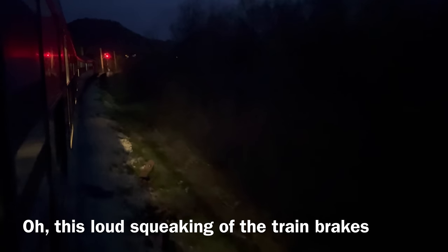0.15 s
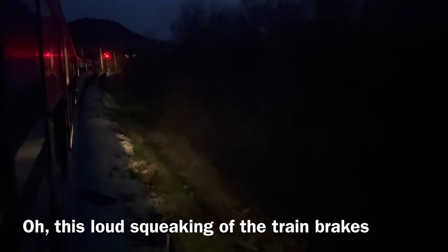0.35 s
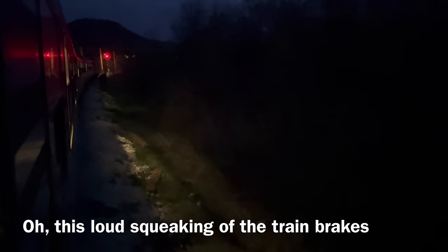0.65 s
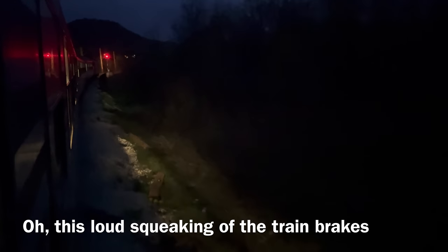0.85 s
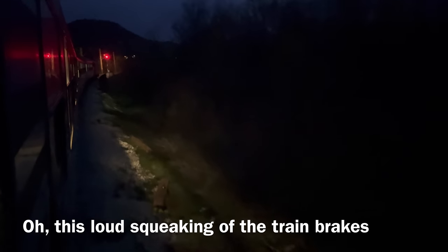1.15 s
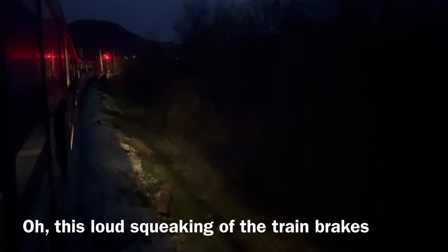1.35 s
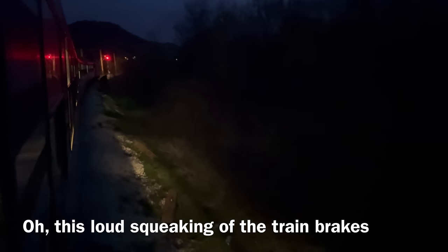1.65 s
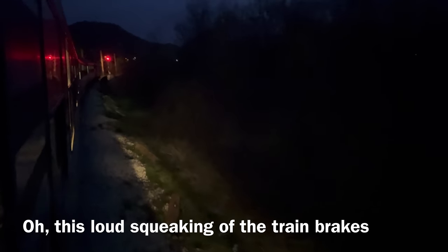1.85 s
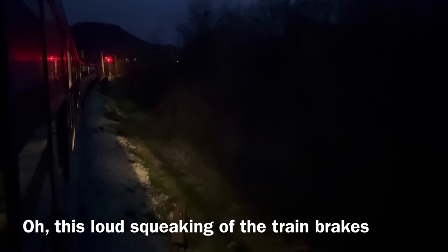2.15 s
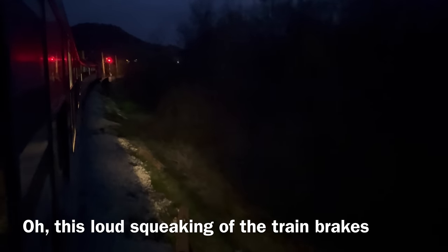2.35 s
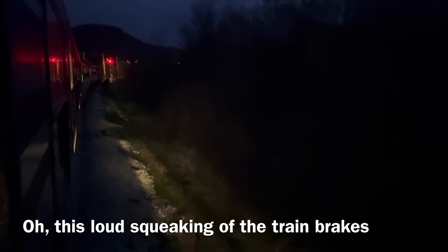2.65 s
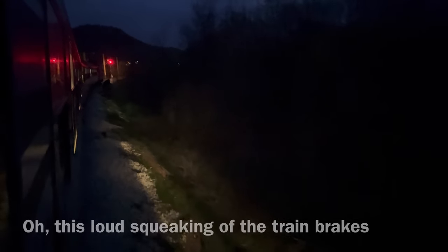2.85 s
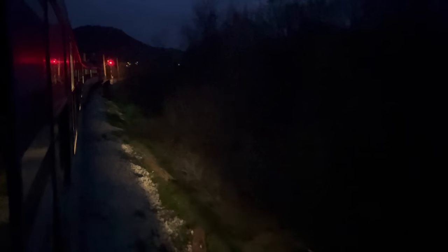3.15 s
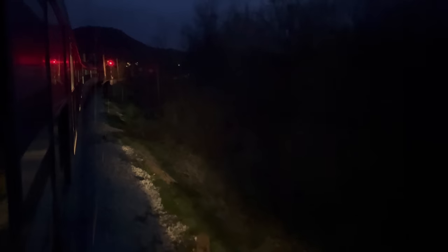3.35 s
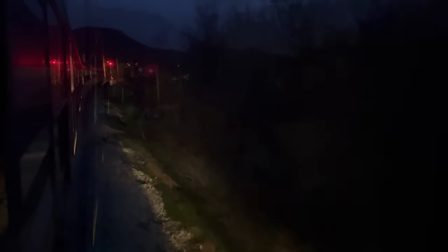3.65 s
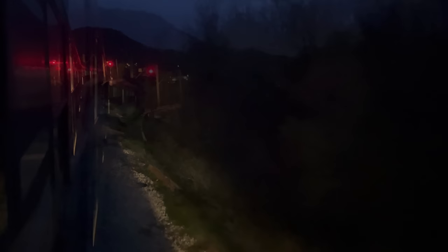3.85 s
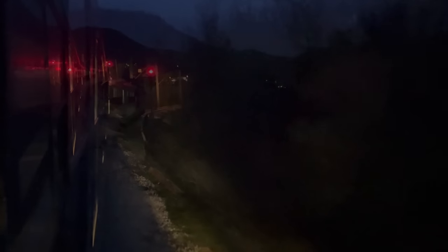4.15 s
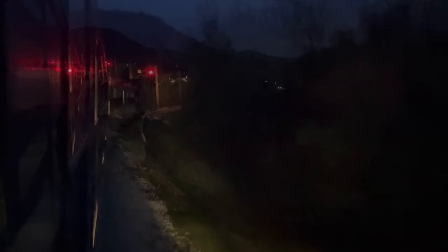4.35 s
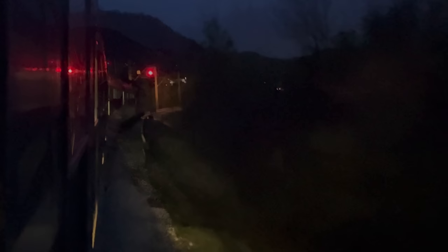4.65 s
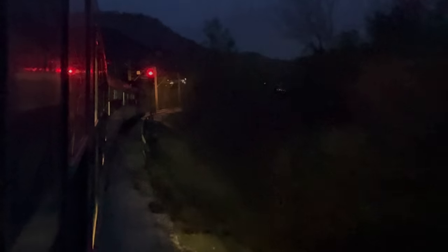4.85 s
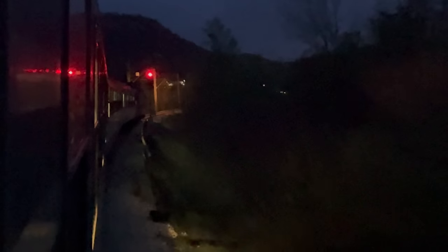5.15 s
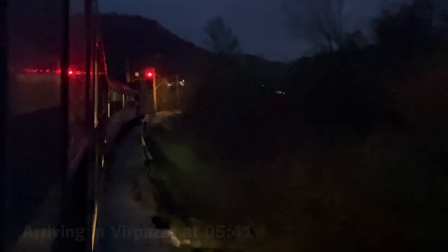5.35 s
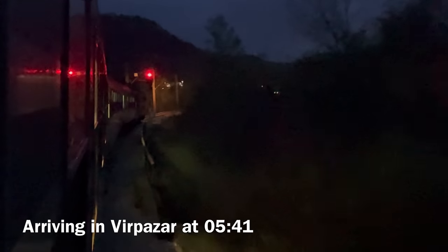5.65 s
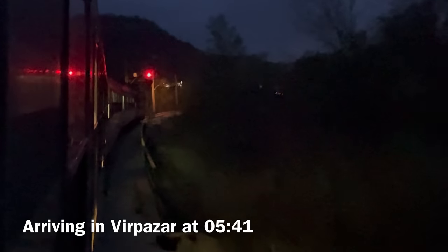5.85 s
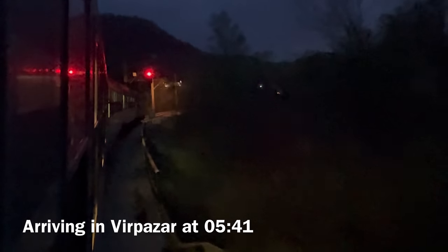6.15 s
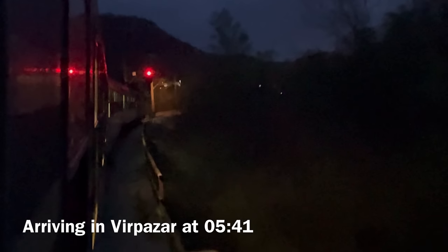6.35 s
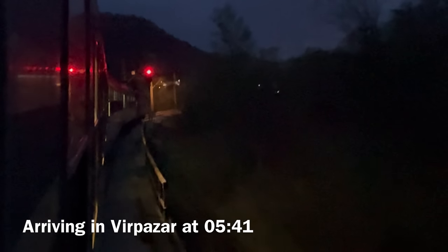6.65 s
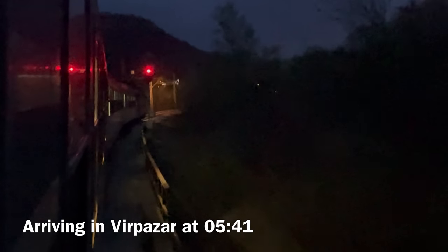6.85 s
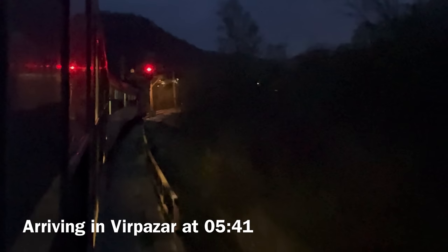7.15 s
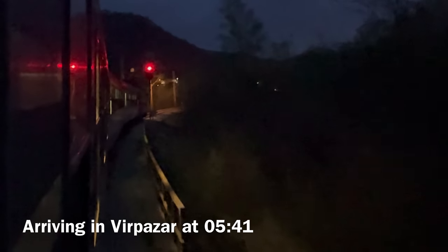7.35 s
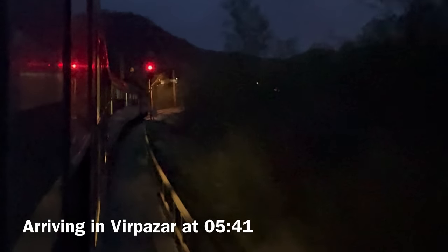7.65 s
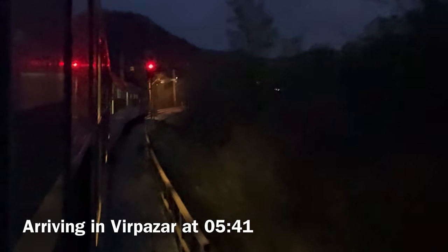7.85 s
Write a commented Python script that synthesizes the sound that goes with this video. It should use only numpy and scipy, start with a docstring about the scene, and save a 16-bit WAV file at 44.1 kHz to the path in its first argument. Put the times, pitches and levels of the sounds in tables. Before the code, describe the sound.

Heard from an open train window, brakes squeal in a piercing, extremely high, fluttering whistle over a quiet low rumble and soft brake hiss. Midway the scene crossfades: the squeal fades, while nearby wheels roar and grind with a bright hiss. Strong low wind buffets and thuds on the exposed stereo microphone, with brief metallic scrapes, continuing to the end.

```python
"""At the open window of a coach, a passenger train brakes.
The brake blocks make the wheels squeal in a few very high modes, each beating over many Doppler-shifted paths.
This squealing scene, over a low distant train, crossfades into a second, windier one.
There rolling noise, grinding hiss and wind are coloured noise, with short thuds of air on the microphone.
Brief rasps, bursts of band-shaped noise, are the wheels scraping."""
import sys
import numpy as np
from scipy import signal
from scipy.fft import rfft, irfft
from scipy.io import wavfile
from scipy.ndimage import uniform_filter1d

SR = 44100
rng = np.random.default_rng(int(sys.argv[2]) if len(sys.argv) > 2 else 0)


def wrap_up_sound(samples):
    """Save the sound to the file named by the first command line argument, as 16-bit audio."""
    columns = np.atleast_2d(samples).T
    # keep every value between -1 and 1, then stretch to whole-number steps
    tamed = np.clip(columns, -1, 1)
    steps = np.round(tamed * 32767).astype(np.int16)
    wavfile.write(sys.argv[1], SR, steps)


N = 352359
T = np.arange(N) / SR
HZ = np.fft.rfftfreq(N, 1 / SR)


def gain_of(db):
    """Decibels to amplitude."""
    return 10 ** (np.asarray(db) / 20)


def evened(x):
    """Scales to rms 1."""
    return x / np.sqrt(np.mean(abs(x) ** 2) + 1e-20)


def curve(rows, axis=1):
    """One column of a time table, for every sample."""
    rows = np.array(rows)
    return np.interp(T, rows[:, 0], rows[:, axis])


def read(rows, axis=1):
    """One column of a frequency table, for every bin."""
    rows = np.array(rows)
    return np.interp(np.log(HZ + 1), np.log(rows[:, 0] + 1), rows[:, axis])


def wander(rate_hz):
    """Smooth chance of rms 1, up to about the given rate."""
    spectrum = rfft(rng.standard_normal(N))
    return evened(irfft(spectrum * np.exp(-(HZ / rate_hz) ** 2), N))


def fade(start, end):
    """Smooth step from 0 at start to 1 at end; it falls instead when end is the earlier moment."""
    return np.sin(np.pi / 2 * np.clip((T - start) / (end - start), 0, 1)) ** 2


def swell(s, half_length):
    """A smooth bump of height 1 around the moment s."""
    return np.exp(-((T - s) / half_length) ** 2)


def pair(a, b, likeness, phase, pan_db):
    """Two unrelated complex signals become what the two microphones pick up."""
    c = np.clip(likeness, 0, 1)
    left = a * gain_of(pan_db / 2)
    right = (c * a + np.sqrt(1 - c * c) * b) * np.exp(-1j * phase) * gain_of(-pan_db / 2)
    return np.array([left, right])


def noise(colour_db, ports, bursts_db=0):
    """Stereo noise of rms 1: a bursty random force coloured by a spectrum."""
    a, b = rfft(rng.standard_normal((2, N)) * gain_of(bursts_db))
    heard = pair(a, b, read(ports, axis=1), read(ports, axis=2), read(ports, axis=3))
    return evened(irfft(heard * gain_of(colour_db), N))


def steadied(x, size):
    """Holds the power over about size samples near 1 and keeps the faster flutter."""
    power = (abs(x) ** 2).mean(0)
    slow_power = uniform_filter1d(uniform_filter1d(power, size), size // 2)
    return x / np.sqrt(abs(slow_power) + 1e-9)


def paths(hz, spread_hz, likeness, phase, pan_db, skew=1, flank=1.53, size=7000, count=131072):
    """One pure wheel tone over countless paths: mostly small Doppler shifts make them beat together.

    A skew above 1 reaches further upwards than downwards.
    """
    steps = 96  # points of the beat pattern in a time of 1 / spread
    shift = np.fft.fftfreq(count, 1 / steps)  # in units of the spread
    strength = np.exp(-.45 * abs(shift / skew ** np.sign(shift)) ** flank)
    beats = np.fft.ifft(strength * np.exp(2j * np.pi * rng.random((2, count))))
    # a narrower spread beats more slowly
    drift = np.cumsum(spread_hz * np.ones(N)) / SR * steps % count
    sides = pair(*evened(beats), likeness, phase, pan_db)
    heard = np.array([np.interp(drift, np.arange(count), side) for side in sides])
    return steadied(heard, size=size) * np.exp(2j * np.pi * hz * T)


# The wheels turn ever more slowly from this starting rate;
# the high spot of the tread first meets the block at about HIGH_SPOT_S.
TURNS_PER_S, SLOWING_PER_S2, HIGH_SPOT_S = 3.16, 0.064, 0.094


def wheel_turn():
    """Block pressure, -1 to 1: it swells once in every turn of the slightly uneven wheel."""
    turns = TURNS_PER_S * (T - HIGH_SPOT_S) - SLOWING_PER_S2 * T ** 2 / 2
    return np.cos(2 * np.pi * turns)


# Wheel resonances that the rail keeps ringing.
# Each row: frequency in Hz, width in Hz, lift in dB.
WHEEL_RESONANCES = [(462, 55, 5), (802, 60, 3), (1080, 34, -3), (1622, 42, 1.5), (2235, 82, 6.5),
                    (2830, 41, 5), (4120, 110, 3.5), (4900, 100, 4.5), (5750, 110, 2.5)]


def wheel_lift():
    """The wheels' resonances as a lift in dB for every bin."""
    return sum(db / (1 + (2 * (HZ - hz) / width) ** 2) for hz, width, db in WHEEL_RESONANCES)


def ringing(x, swing_db=2.0, swing_hz=4.5):
    """Passes rolling noise through the wheels, each resonance coming and going on its own."""
    spectrum = rfft(x)
    out = x
    for hz, width, db in WHEEL_RESONANCES:
        band = irfft(spectrum / (1 + (2 * (HZ - hz) / width) ** 2), N)
        out = out + band * (gain_of(db) - 1) * gain_of(swing_db * wander(swing_hz))
    return out


# The microphone pair for far sound. Each row: frequency in Hz, left-right likeness from 0 to 1,
# phase by which left leads in radians, left minus right in dB.
FAR_PICKUP = [(60, .5, 0, .4), (330, .5, -.4, -3), (500, .87, .3, -3.8), (1200, .6, -.3, -2),
              (1800, .7, -.3, 2), (2400, .35, -2.7, -2), (3500, .3, -1, -3), (6000, .15, -1, -5.5),
              (8200, .8, -3, 0), (10400, .8, 0, 0)]
# The coach's swaying. Each row: time in seconds, rumble in dB before the trim.
RUMBLE_LEVEL = [(0, -51), (.7, -51.5), (.9, -51), (1.12, -50), (1.3, -54.5), (2, -51.5), (2.4, -55),
                (3.3, -55)]
# Wheels and brake blocks of the coaches further off.
# Each row: time in seconds, rush in dB, brake hiss in dB.
RUSH_LEVEL = [(0, -51, -55), (.7, -52.5, -57), (1.2, -52, -58), (1.5, -52, -57.5), (2.2, -52, -59.5),
              (3, -54, -63), (3.5, -50, -60), (4.3, -40.5, -76), (5, -36, -70)]
# Their spectra: rumble, rush, brake hiss. Each row: frequency in Hz, relative density in dB.
RUMBLE_SPECTRUM = [(12, -25), (25, -16), (60, 4), (100, -4), (160, -4), (260, -16), (500, -22), (1200, -58)]
RUSH_SPECTRUM = [(150, 4.5), (260, 1.5), (385, -1.5), (430, 2), (480, 3.5), (560, 4), (680, 2.5),
                 (820, 0.5), (950, -3), (1300, -4.5), (1800, -3.5), (2300, -27.5), (3500, -27), (7000, -51)]
DISTANT_HISS_SPECTRUM = [(1500, 2.5), (2600, 6.5), (3800, 3), (6500, 3), (8200, 5), (10200, -25),
                         (11500, -21), (15000, -30)]


def distant_train(rumble_db=0.5, sway_db=1.5, sway_hz=7):
    """Low swaying rumble, soft rush and brake hiss, fading out as the first scene gives way to the second."""
    rumble = steadied(noise(read(RUMBLE_SPECTRUM), FAR_PICKUP, 1.0 * wander(33)), size=12000)
    rumble = rumble * gain_of(curve(RUMBLE_LEVEL) + rumble_db + sway_db * wander(sway_hz))
    rush = noise(read(RUSH_SPECTRUM) + wheel_lift(), FAR_PICKUP, .5 * wander(9.1))
    rush = rush * gain_of(curve(RUSH_LEVEL, axis=1))
    hiss = noise(read(DISTANT_HISS_SPECTRUM), FAR_PICKUP, .5 * wander(14))
    hiss = hiss * gain_of(curve(RUSH_LEVEL, axis=2))
    return (rumble + rush + hiss) * fade(5.86, 3.8)


# The microphone pair for near sound. Each row: frequency in Hz, left-right likeness from 0 to 1,
# phase by which left leads in radians, left minus right in dB.
NEAR_PICKUP = [(60, .92, 0, -.6), (200, .68, .05, -1.2), (400, .33, .6, -1.8), (800, .38, 1, -5.5),
               (1250, .45, -.7, -2.4), (1900, .997, 0, 0), (4100, .99, 0, 0), (5600, .86, -1.1, 0),
               (6500, .83, -.25, 0), (7300, .7, -.9, 0), (7800, .85, -2.8, 0), (9100, .83, -2.6, 0),
               (10400, .95, 0, 0), (11600, .85, 0, 0), (12700, .95, 3, 0)]
# Wheels on the rails close by.
# Each row: time in seconds, roar in dB and grinding hiss in dB, both before trim and ringing.
ROLLING_LEVEL = [(3.3, -59, -63), (3.55, -49, -61.5), (4.0, -46, -55), (4.6, -41, -50), (5.05, -35, -39.5),
                 (5.33, -36.5, -44), (5.7, -33.5, -39), (6.2, -33, -37.5), (6.45, -31.5, -34.5),
                 (6.8, -31, -37), (7.1, -31.5, -37.5), (7.35, -31, -36.5), (7.52, -32.5, -38),
                 (7.7, -31, -35.5), (7.99, -31.5, -37.5)]
# Spectra of roar and hiss. Each row: frequency in Hz, relative density in dB.
ROAR_SPECTRUM = [(150, -17), (450, 2.5), (800, 1), (1150, -4), (1650, -4), (1900, -7), (2400, -5.5),
                 (2900, -11), (3400, -19), (5000, -45)]
HISS_SPECTRUM = [(1500, -13.5), (3400, -9.5), (4100, -3), (5800, 1), (6500, -2.5), (7300, -7), (8800, 0.5),
                 (10200, -2), (11400, -8.5), (12200, -3.5), (12900, -10), (14000, -11.5), (15000, -8),
                 (16000, -33)]


def rolling(roar_db=1.78, hiss_db=5.0, roar_turn_db=0.33, hiss_turn_db=1.0, uneven_db=0.6, uneven_hz=9,
            roar_flicker_db=0.54, hiss_flicker_db=1.13, sizzle_hz=7600):
    """Rough rails ring the wheels; the blocks grind harder once a turn, with a sizzle that opens near 4.8 s."""
    turn, rail_db = wheel_turn(), uneven_db * wander(uneven_hz)
    roar = noise(read(ROAR_SPECTRUM), NEAR_PICKUP, roar_flicker_db * wander(40))
    roar = roar * gain_of(curve(ROLLING_LEVEL, axis=1) + roar_db + roar_turn_db * turn + rail_db)
    hiss = noise(read(HISS_SPECTRUM), NEAR_PICKUP, hiss_flicker_db * wander(33))
    hiss = hiss * gain_of(curve(ROLLING_LEVEL, axis=2) + hiss_db + hiss_turn_db * turn + rail_db)
    dull = irfft(rfft(hiss) / (1 + (HZ / sizzle_hz) ** 16), N)
    sizzle = hiss - dull
    sizzle_share = .05 + .45 * fade(4.73, 4.85) + .5 * fade(4.9, 5.03)
    grinding = (dull + sizzle_share * sizzle) * fade(3.42, 3.47)
    return ringing(roar * fade(2.67, 4.33) + grinding)


# Clear tones that the rolling wheels keep singing.
# Each row: frequency in Hz, dB relative to the far rush curve, dB relative to the near roar curve.
SINGING_TONES = [(449.5, -17, -26), (534, -13, -17), (831, -11.5, -13), (1057, -23, -29),
                 (1146, -21.5, -38), (2244, -27, -27)]


def singing_wheels(spread_hz=4.5):
    """Narrow wheel tones stand a little out of the rolling noise and follow its level."""
    far = gain_of(curve(RUSH_LEVEL, axis=1)) * fade(6.2, 5.1)
    near = gain_of(curve(ROLLING_LEVEL, axis=1)) * fade(3.27, 3.3)
    out = np.zeros((2, N))
    for hz, far_db, near_db in SINGING_TONES:
        level = far * gain_of(far_db) + near * gain_of(near_db)
        out += paths(hz, spread_hz, 1.0, 0, -2).real * level
    return out


# The wind on the microphone, faded in with the second scene.
# Each row: time in seconds, buffeting in dB and flutter in dB, both before gusts and trim.
WIND_LEVEL = [(3.35, -48, -62), (3.6, -45, -48), (4.5, -32, -30.5), (4.95, -32, -31), (5.45, -21, -24),
              (5.95, -22, -24.5), (6.45, -19, -25.5), (6.7, -16.5, -18.5), (7.99, -22, -27.5)]
# Strong gusts and short lulls. Each row: centre in seconds, half length in seconds,
# buffeting lift in dB, flutter lift in dB.
WIND_GUSTS = [(4.048, 0.034, 0, -9), (4.526, 0.23, -1, 2.5), (5.13, 0.029, -3, 9), (5.529, 0.037, 4.5, 2.5),
              (6.172, 0.13, 2.5, 6.5), (6.88, 0.08, -0.5, 1.5), (7.313, 0.05, 0.5, 3),
              (7.927, 0.027, 1, 2.5)]
# Speed of the air past the microphone. Each row: time in seconds, speed from 0 slow to 1 fast.
AIRFLOW = [(3.3, 0.091), (5.8, 0.15), (6.4, 0.34), (6.75, 0.73), (7.35, 1), (7.6, 0.21), (8, 0.11)]
# Spectra of buffeting and of flutter in slow air. Each row: frequency in Hz, relative density in dB.
BUFFET_SPECTRUM = [(12, -34), (25, -29), (45, -3), (65, 0), (95, -1.5), (140, -6), (200, -8.5),
                   (300, -17.5), (600, -38), (1500, -71)]
FLUTTER_SPECTRUM = [(60, -20), (130, -5), (190, 0), (270, -2.5), (380, -11.5), (600, -27.5), (1000, -28),
                    (2500, -76)]


def wind(buffet_db=1, flutter_db=-1.5, buffet_burst_db=1.5, flutter_burst_db=3.5,
         buffet_lump_db=1.0, flutter_lump_db=2.0, lump_hz=16, fast_stretch=1.29):
    """Wind comes in lumps and eddies: big ones buffet, small ones flutter, higher in pitch in faster air."""
    eddies = wander(59)
    buffet = noise(read(BUFFET_SPECTRUM), NEAR_PICKUP, buffet_burst_db * eddies)
    buffet = steadied(buffet, size=6000)
    slow_colour_db = read(FLUTTER_SPECTRUM)
    fast_colour_db = np.interp(HZ / fast_stretch, HZ, slow_colour_db)
    slow = noise(slow_colour_db, NEAR_PICKUP, flutter_burst_db * eddies)
    fast = noise(fast_colour_db, NEAR_PICKUP, flutter_burst_db * eddies)
    speed = np.clip(curve(AIRFLOW), 0, 1)
    flutter = steadied(np.sqrt(1 - speed) * slow + np.sqrt(speed) * fast, size=6000)
    buffet_level_db = curve(WIND_LEVEL, axis=1) + buffet_db + buffet_lump_db * wander(lump_hz)
    flutter_level_db = curve(WIND_LEVEL, axis=2) + flutter_db + flutter_lump_db * wander(lump_hz)
    for s, half_length, buffet_lift_db, flutter_lift_db in WIND_GUSTS:
        gust = swell(s, half_length)
        buffet_level_db = buffet_level_db + buffet_lift_db * gust
        flutter_level_db = flutter_level_db + flutter_lift_db * gust
    return (buffet * gain_of(buffet_level_db) + flutter * gain_of(flutter_level_db)) * fade(3.34, 3.574)


# Single low thuds and wind slaps.
# Each row: centre in seconds, push in dB, frequency of the push in Hz, snap in dB.
WIND_THUDS = [(.76, -44, 165, -62), (.825, -39, 160, -62), (.87, -38, 100, -60), (1.005, -40, 69.9, -62),
              (1.06, -41, 65, -66), (1.118, -36, 150, -54), (1.87, -38, 80, -60), (2.08, -37, 90, -60),
              (2.543, -35.5, 74.6, -56), (2.765, -40, 70, -66), (3.038, -43, 130, -60),
              (3.205, -37.5, 75, -62), (3.245, -37, 70, -62), (3.7, -29, 150.8, -33),
              (3.985, -27, 172, -36), (4.04, -22.5, 55.2, -40), (4.165, -27, 150, -31),
              (4.317, -16, 160, -26), (4.412, -22, 200, -24), (4.435, -20, 139, -22),
              (4.533, -14.5, 149.6, -24), (4.948, -28, 200, -20), (5.298, -22, 140, -15),
              (5.48, -17, 109, -21), (5.531, -19, 110, -14.5), (5.571, -9.5, 169, -29),
              (5.664, -5.5, 189, -15), (5.8, -14, 203, -11), (6.065, -8, 101, -14),
              (6.114, -4.5, 167.4, -12), (6.189, -9, 150, -12), (6.222, -10, 110, -11),
              (6.56, -17, 150, -11), (6.592, -5.5, 94, -11), (6.637, -11, 110, -7.5), (6.72, -7, 74.5, -26),
              (6.738, -13, 150, -10.5), (6.826, -10, 170, -11), (6.845, -6, 90.5, -18),
              (6.864, -14, 150, -10.5), (6.887, -8, 130, -14), (6.966, -8, 120, -22),
              (6.982, -16, 150, -8.5), (7.047, -27, 150, -9), (7.097, -7, 67, -6), (7.17, -18, 120, -11.5),
              (7.227, -15, 150, -13), (7.282, -12, 130, -8.5), (7.344, -4, 70.4, -7),
              (7.454, -15, 151, -13.5), (7.52, -7.5, 136, -12), (7.644, -8, 88.7, -24)]


def thuds(cycles=0.65, snap_hz=345, snap_cycles=0.65):
    """Each thud is one short push and pull of air, with a quicker snap where the eddy breaks on the microphone."""
    out = np.zeros((2, N))
    for s, push_db, push_hz, snap_db in WIND_THUDS:
        near = abs(T - s) < .06
        push = (push_db, push_hz, cycles, .21)
        snap = (snap_db, snap_hz, snap_cycles, .5)
        for level_db, rate, width, apart in (push, snap):
            turns = (T[near] - s) * rate
            # the two sides differ by a random phase of about apart radians
            phase = 2 * np.pi * rng.random() + apart * rng.standard_normal((2, 1))
            wave = np.exp(-(turns / width) ** 2) * np.cos(2 * np.pi * turns + phase)
            out[:, near] += gain_of(level_db) * wave
    return out


# Scrapes and spits of the running gear.
# Each row: start in seconds, level in dB before the envelope, centre in Hz, decay length in seconds.
GEAR_SCRAPES = [(0.832, -62, 4700, .08), (1.38, -59.5, 5200, 0.14), (3.735, -56, 5410, .06),
                (3.83, -53, 5470, .06), (4.019, -40, 5860, .045), (4.285, -48, 5400, .06),
                (4.392, -47.5, 5500, .12), (4.01, -50, 10500, .025), (4.8, -51, 11500, .05),
                (4.84, -47, 6500, 0.082), (5.68, -35.5, 6760, 0.054), (6.303, -34, 5370, .05),
                (6.306, -29, 1820, 0.05), (6.56, -35, 2070, .06), (6.837, -30.5, 4900, 0.055),
                (6.896, -30, 6000, 0.06), (6.9, -35, 10500, .06), (7.62, -36, 5500, 0.081),
                (7.645, -37, 2250, 0.093)]


def scrapes(octaves=0.56, attack=0.008, size=16384):
    """Short rasps of wheel on rail: band-shaped noise with a quick rise and a slower fall."""
    out, grit = np.zeros((2, N)), noise(0, NEAR_PICKUP)
    for s, db, hz, length in GEAR_SCRAPES:
        at = np.flatnonzero(T >= s)[:size]
        age, bins = T[at] - s, np.fft.rfftfreq(len(at), 1 / SR)
        band_db = -6 * (np.log2((bins + 1) / hz) / octaves) ** 2
        rasp = evened(irfft(rfft(grit[:, at]) * gain_of(band_db), len(at)))
        envelope = np.minimum(age / attack, 1) * np.exp(-(age / length) ** 2)
        out[:, at] += rasp * gain_of(db) * envelope
    return out


# Weaker modes that swell and fade. Each row: frequency in Hz, spread in Hz, loudest moment in seconds,
# rise in seconds, fall in seconds, peak level in dB before the trim, pan in dB (left minus right),
# left-right likeness from 0 to 1.
SIDE_MODES = [(6638, 35, 0.064, 1, 0.97, -50.5, -4, 0.46), (13930, 70, .25, 1.45, 1.15, -55.5, 0, 0.13),
              (5360, 70, 0.34, 1.4, 0.98, -68.5, -5, .3), (14850, 150, 1.0, 1.7, 1.6, -66, -1, 0.58),
              (7500, 70, 0.49, 2.8, 3.6, -70, -9, .4), (2220, 55, 1.44, 0.055, 0.075, -61, 0, 0.39),
              (9225, 45, 1.8, 4.4, 3.9, -68, -8, .4), (10215, 66, 1.8, 5.5, 2.7, -60.5, 5, .6),
              (4700, 130, 0.84, .07, .1, -67, -4, .4), (4060, 55, 1.575, .06, .07, -61, -4, .4),
              (5690, 40, 6.68, .25, 0.27, -44, 0, .85), (6550, 80, 1.44, 0.11, 0.18, -63.5, -5.5, .4),
              (6630, 45, 2.2, .3, .4, -72, -4, 0.35), (1982, 7, 5.43, 0.054, 0.092, -40.5, 2, 0.97)]


def side_squeals(edge_db=22, level_db=5.5, waver_db=2.0):
    """Other wheel modes catch for a while, swell unevenly and let go."""
    out = np.zeros((2, N))
    grip_db = level_db + waver_db * wander(8.7)
    for hz, spread, s, rise, fall, db, pan_db, likeness in SIDE_MODES:
        away = np.where(T < s, (s - T) / rise, (T - s) / fall)
        drop_db = edge_db * np.minimum(away, 3) ** 2  # edge_db down at the end of rise or fall
        out += paths(hz, spread, likeness, 0, pan_db).real * gain_of(db + grip_db - drop_db)
    return out


# A lower, fainter mode. Each row: time in seconds, level in dB before trim and grabs.
FAINT_LEVEL = [(.2, -78), (.42, -64), (.7, -67), (1.0, -62), (1.45, -60.5), (2.1, -62), (2.52, -65),
               (2.7, -80), (2.9, -86)]
# Moments when it grabs. Each row: centre in seconds, lift in dB.
FAINT_GRABS = [(.47, 10), (1.385, 11.5), (1.46, 9), (1.59, 11), (1.97, 7.5)]


def faint_squeal(hz=4362, spread_hz=30, level_db=4, pan_db=-5, waver_db=2.0, waver_hz=14, grab_s=0.04,
                 halo_hz=4200, halo_spread_hz=120, halo_db=-12):
    """A lower wheel mode that sings on inside a rough halo and grabs now and then."""
    grab_db = sum(db * swell(s, grab_s) for s, db in FAINT_GRABS)
    grip_db = curve(FAINT_LEVEL) + level_db + waver_db * wander(waver_hz) + grab_db
    tone = paths(hz, spread_hz, 0.5, 0, pan_db, size=2400)
    halo = paths(halo_hz, halo_spread_hz, .3, 0, pan_db) * gain_of(halo_db)
    return (tone + halo).real * gain_of(grip_db) * fade(0.091, .3) * fade(3.1, 2.8)


# The two strong squeal modes, high and low. Each row: time in seconds, level in dB before the trim.
HIGH_LEVEL = [(0.0, -32), (0.7, -35), (1.3, -31.0), (1.9, -30.5), (2.3, -33), (3.2, -32), (3.5, -30.5),
              (4.12, -32), (4.17, -33.5), (4.7, -36.5), (5.17, -41), (5.25, -46), (5.6, -53)]
LOW_LEVEL = [(0.0, -42.5), (0.6, -43), (1.15, -51), (1.6, -51.5), (2.4, -44.5), (2.75, -57), (2.88, -65),
             (3.25, -69.5), (3.55, -58.5), (3.8, -57), (4.3, -56.5), (4.42, -66), (4.49, -59), (4.56, -70),
             (4.7, -67), (4.8, -74), (4.95, -77)]
# Each mode: frequency in Hz, left-right likeness from 0 to 1, phase by which left leads in radians.
HIGH_TONE, LOW_TONE = (9675, .98, -1.5), (8620, .88, -2.75)
# Doppler spread of the high mode's paths. Each row: time in seconds, spread in Hz.
DOPPLER_SPREAD = [(0, 45), (.7, 45.8), (1.2, 30.4), (2.2, 32.3), (3.2, 29), (3.9, 21), (4.4, 14.1),
                  (5.7, 11)]
# The high mode flares or slackens for an instant. Each row: centre in seconds, lift in dB.
HIGH_FLARES = [(.035, 4.5), (.27, -1), (1.133, 2.5), (1.215, 4.5), (1.615, 1.5), (1.676, 3), (1.851, 3.5),
               (1.914, 5), (2.081, 7.5), (2.255, -7), (2.34, 2), (2.45, -1), (2.55, -4.5), (2.645, 4),
               (2.725, 4.5), (3.005, 4.5), (3.12, -3.5), (3.22, -3), (3.416, 5), (3.471, 4), (3.555, -1),
               (3.692, 4), (3.79, -3), (3.86, 7), (4.115, 2.5), (4.17, -6)]


def squeal(low_share=.9, low_spread_hz=22, high_db=7.0, low_db=17, turn_db=0.5, waver_db=1.0, waver_hz=9,
           low_waver_db=1.2, low_waver_hz=11, flare_s=0.019, rough_db=-33.5, rough_hz=750,
           skirt_db=-25, skirt_hz=190, sideband_db=11, difference_db=-12):
    """Two self-excited modes throb with the wheel and combine, with a rough noisy edge, strongest when loud."""
    spread, turn = curve(DOPPLER_SPREAD), turn_db * wheel_turn()
    flare_db = sum(db * swell(s, flare_s) for s, db in HIGH_FLARES)

    high = paths(HIGH_TONE[0], spread, *HIGH_TONE[1:], 0, skew=1.32, size=6000)
    # in a flare one path leads and the beating eases
    high = high + np.clip(flare_db / 6, 0, 1) * (steadied(high, size=1400) - high)
    high_level_db = curve(HIGH_LEVEL) + turn + waver_db * wander(waver_hz) + flare_db + high_db
    high = high * gain_of(high_level_db) * fade(5.9, 5.8)

    low_spread = np.maximum(low_share * spread, low_spread_hz)
    low = paths(LOW_TONE[0], low_spread, *LOW_TONE[1:], 0, skew=1.04, size=8000)
    low_level_db = curve(LOW_LEVEL) + turn + low_waver_db * wander(low_waver_hz) + low_db
    low = low * gain_of(low_level_db) * fade(5.2, 4.8)

    sideband = gain_of(sideband_db) * high * high * low.conj()  # at twice high minus low
    difference = gain_of(difference_db) * high * low.conj()  # at high minus low
    roughness = evened(wander(rough_hz) + 1j * wander(rough_hz))
    roughness = gain_of(rough_db) * roughness * evened(abs(high)) / 2
    skirt = gain_of(skirt_db) * evened(wander(skirt_hz) + 1j * wander(skirt_hz))
    return ((high + low) * (1 + roughness + skirt) + sideband + difference).real


def scene():
    """All that reaches the window."""
    background = distant_train() + rolling() + singing_wheels() + wind() + thuds()
    brakes = scrapes() + side_squeals() + faint_squeal() + squeal()
    return background + brakes


EDGE_HZ = 15650  # cutoff of the treble in Hz


def record(dry):
    """The recorder rounds off the tallest peaks towards 0.9 and cuts the treble above the cutoff."""
    rounded = dry / (1 + abs(dry / .9) ** 6) ** (1 / 6)
    lowpass = signal.firwin(511, EDGE_HZ, window=("kaiser", 9), fs=SR)
    return signal.oaconvolve(rounded, lowpass[None], "same", axes=1)


dry = scene()
out = record(dry)
wrap_up_sound(out)
```